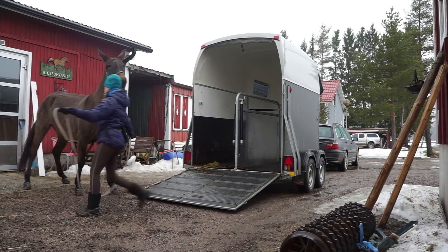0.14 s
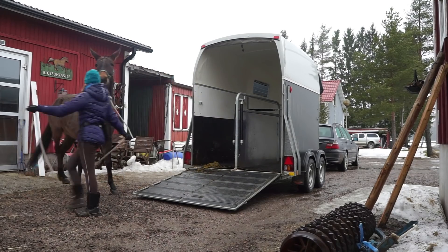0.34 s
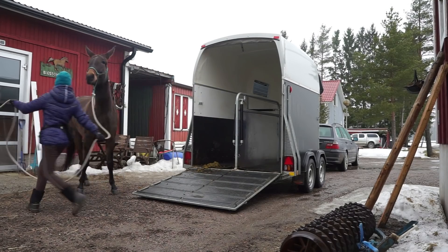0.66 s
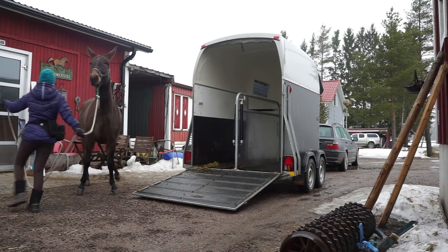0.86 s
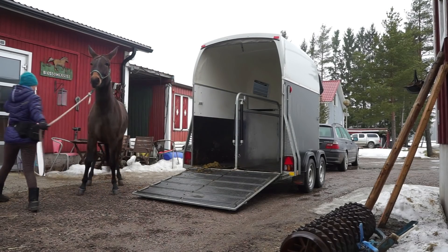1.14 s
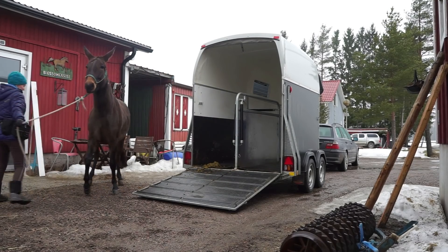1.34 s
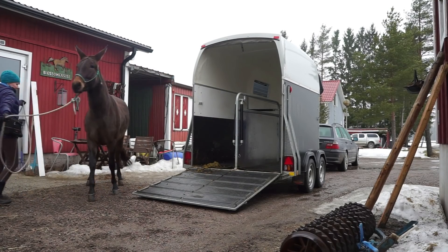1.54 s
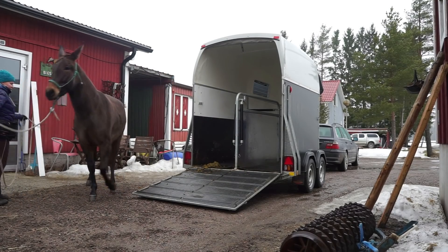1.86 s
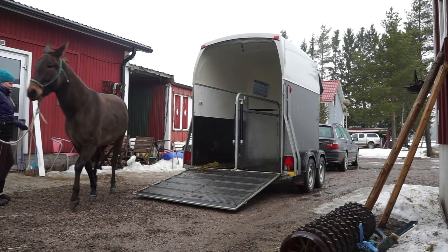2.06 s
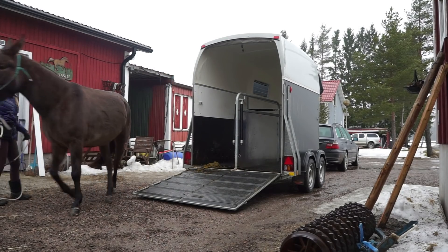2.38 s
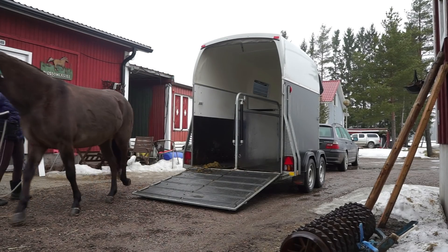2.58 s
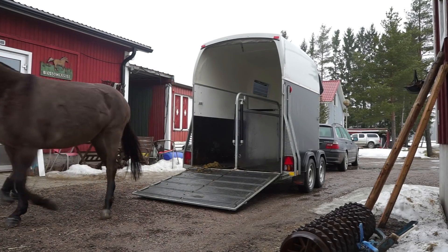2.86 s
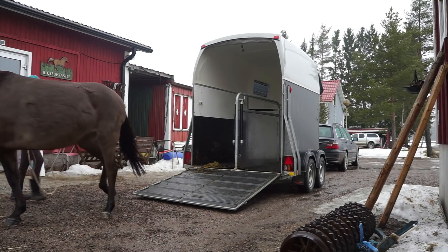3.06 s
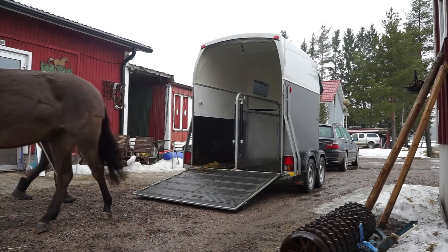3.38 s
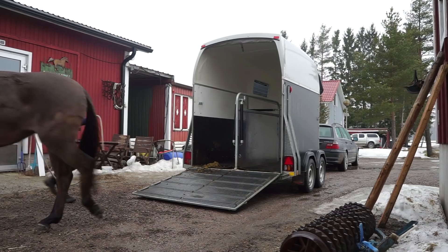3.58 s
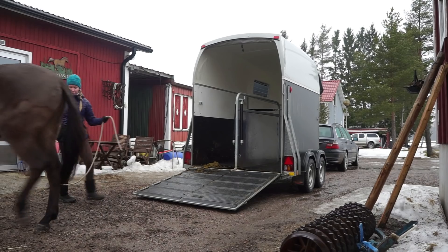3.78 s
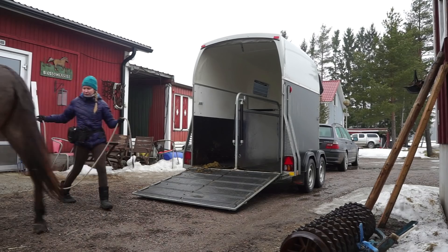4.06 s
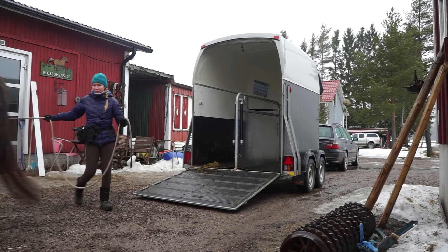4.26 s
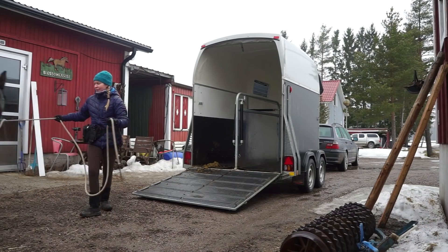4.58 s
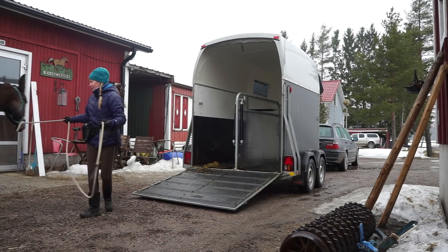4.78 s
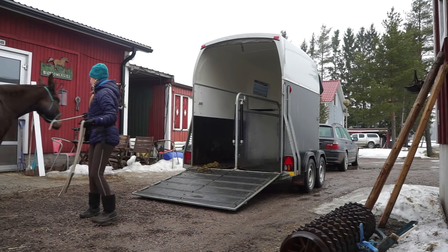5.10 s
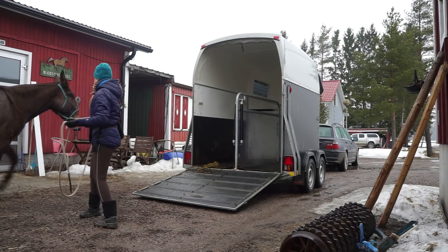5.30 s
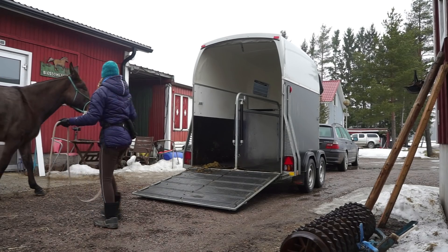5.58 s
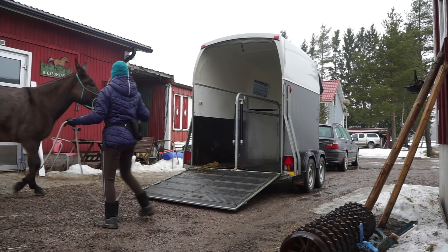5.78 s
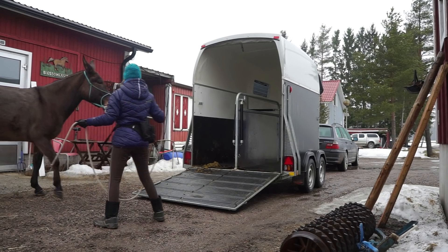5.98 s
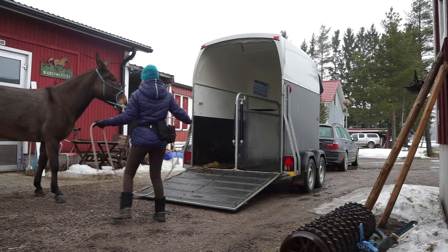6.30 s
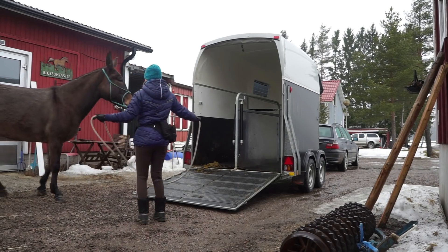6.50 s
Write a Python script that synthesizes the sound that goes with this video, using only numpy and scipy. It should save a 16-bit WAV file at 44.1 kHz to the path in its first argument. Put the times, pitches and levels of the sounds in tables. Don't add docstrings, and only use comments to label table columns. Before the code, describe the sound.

Close, irregular hoofsteps on muddy gravel in an open yard. Stones crunch, crack and snap brightly, hollow hooves knock, mud gives small dull squelches and the ground thuds low. The steps come thick and loud in the first three seconds, then thin out into lighter, separate crunches. Wind puffs lightly on the stereo microphone, over a faint distant hush, with a short reflection from a barn wall.

```python
import sys
import numpy as np
from scipy import signal
from scipy.fft import rfft, irfft, next_fast_len
from scipy.io import wavfile

SR = 44100
rng = np.random.default_rng(int(sys.argv[2]) if len(sys.argv) > 2 else 0)


def master(y):
    cut = np.clip(np.atleast_2d(y).T, -1, 1)
    pcm = np.round(cut * 32767)
    wavfile.write(sys.argv[1], SR, pcm.astype(np.int16))


def makeup_ratio(level_db):
    decades = np.asarray(level_db, float) / 20
    return 10 ** decades


N = 293265


def rms_one(x):
    return x / np.sqrt(np.mean(x ** 2) + 1e-20)


def band(x, low_hz, high_hz):
    return signal.sosfilt(signal.butter(2, [low_hz, high_hz], "band", fs=SR, output="sos"), x)


def drift(rate_hz):
    steps = rng.standard_normal(800)
    return np.interp(np.arange(N) / SR * rate_hz, np.arange(800), steps) * 1.184


def between(rows):
    return np.interp(np.arange(N) / SR, *np.transpose(rows))


def swell(s, rise_ms, fall_ms, level_db):
    coarse = np.arange(0, N, 32)
    ms = (coarse[None] / SR - np.array(s)[:, None]) * 1000
    rise = np.maximum(np.array(rise_ms)[:, None] - 3, 1.0)
    fall = np.maximum(np.minimum(fall_ms, 55)[:, None] - 3, 1.0)
    loss_db = 8 * np.where(ms < 0, (ms / rise) ** 2, np.abs(ms / fall) ** 1.4)
    power = makeup_ratio(2 * (np.array(level_db)[:, None] - np.minimum(loss_db, 150))).sum(axis=0)
    return np.interp(np.arange(N), coarse, np.sqrt(power))


def cracks(per_s, spread_db):
    sizes = makeup_ratio(spread_db * np.minimum(rng.exponential(1, N), 5)) * rng.choice([-1, 1], N)
    return rms_one(sizes * (rng.random(N) < per_s / SR))


def ring(clicks, hz, cycles):
    r = np.exp(-np.log(1000) * hz / cycles / SR)
    w = 2 * np.pi * hz / SR
    return signal.lfilter([2 * np.sin(w) * np.sqrt(1 - r)], [1, -2 * r * np.cos(w), r * r], clicks + 1e-18)


# time in seconds, lag of the left port in ms.
BEARING_LAG = [(0, 0.16), (0.68, 0.28), (1.45, 0.12), (2.45, 0.093), (3.3, 0.36), (6.65, 0.3)]


def arrival(scatter_ms):
    lag = (between(BEARING_LAG) + scatter_ms * rng.standard_normal(N)) * SR / 1000
    return np.clip(np.arange(N) + np.round(lag).astype(int), 0, N - 1)


def placed(clicks, at):
    return np.array([np.bincount(at, clicks, N), clicks])


# frequency in Hz, level in dB per Hz.
HUSH_COLOUR = [(30, -28.5), (87, -10.5), (240, -0.5), (750, -6), (1850, -17.5), (5300, -41), (7500, -24.5),
               (10400, -26.5), (16000, -38)]


def hush():
    hz = np.arange(N // 2 + 1) * SR / N + 1
    mid, side = rfft(rng.standard_normal((2, N)))
    alike = 1 / (1 + (hz / 600) ** 2)
    colour_hz, colour_db = np.transpose(HUSH_COLOUR)
    colour = makeup_ratio(np.interp(np.log(hz), np.log(colour_hz), colour_db))
    pair = np.sqrt(1 + alike) * mid + np.sqrt(1 - alike) * side * [[1], [-1]]
    return makeup_ratio(-54) * rms_one(irfft(colour * pair, N))


# time in seconds, level in dB.
GUSTS = [(0, -52), (0.401, -35), (1.169, -40.5), (1.45, -53.5), (2.471, -61), (2.699, -43), (3.45, -70),
         (4.5, -49.5), (4.74, -70), (5.2, -53), (6.65, -82)]


def wind():
    shared, *own = rng.standard_normal((3, N))
    lumps = [makeup_ratio(7.2 * drift(22)) * rms_one(band(v + 0.11 * shared, 54, 121)) for v in own]
    return makeup_ratio(between(GUSTS) - 6.0) * np.array(lumps)


# time in seconds, settling in ms, coarse stones in dB, fine stones in dB.
STAMPS = [(0.063, 7, -26, -23), (0.295, 4.2, -31, -53), (0.38, 3.3, -32, -41), (0.467, 45, -43, -27),
          (0.628, 10, -34, -33), (0.87, 6.7, -22, -27), (1.035, 19, -31, -21.5), (1.114, 72, -40.5, -36),
          (1.4, 9.8, -41, -51), (1.482, 59, -55, -32.5), (1.64, 33, -29.5, -33.5),
          (1.78, 14.4, -27.5, -21.5), (2.009, 28, -40, -52.5), (2.056, 46, -40.5, -31.5),
          (2.283, 25, -60, -14), (2.379, 9.8, -24, -15), (2.805, 45, -39, -29), (2.848, 32, -26, -33.5),
          (3.286, 27, -49.5, -35.5), (3.623, 70, -37, -31), (4.165, 5.8, -85, -42), (4.429, 40, -37, -29),
          (4.784, 15.5, -44, -28.5), (4.938, 32, -58, -42.5), (5.08, 31, -63, -30), (5.093, 60, -38, -42),
          (5.365, 21, -64, -41), (6.107, 34.5, -43.5, -33), (6.322, 23, -36.5, -54), (6.57, 9, -65, -32.5)]
# time in seconds, loading in ms, coarse stones in dB, fine stones in dB.
GRINDS = [(0.1, 61, -33.5, -34), (0.519, 15, -29, -23.5), (0.579, 22.6, -24, -21),
          (0.936, 47, -38.5, -29.5), (1.058, 6.4, -25.5, -9.5), (1.15, 13, -32.5, -31.5),
          (1.184, 28, -42.5, -37.5), (1.512, 32, -34.5, -29), (1.556, 17.4, -32.5, -20.5),
          (1.824, 14, -34.5, -29.5), (1.904, 36, -39.5, -33.5), (2.16, 32, -32, -37),
          (2.256, 7.8, -48.5, -33.5), (2.723, 12, -42, -29.5), (4.253, 16, -47.5, -28.5),
          (5.395, 26, -45.5, -26.5), (5.569, 19, -53, -40.5), (5.706, 23, -47, -37.5),
          (5.769, 20, -56, -51), (6.013, 20.6, -46.5, -28), (6.394, 23, -68, -31.5),
          (6.452, 31.5, -41, -31), (6.495, 27, -47.5, -47.5), (6.591, 12, -82, -32.5)]
# time in seconds, settling in ms, coarse stones in dB, fine stones in dB.
TWISTS = [(0.009, 36, -39, -28.5), (0.214, 29, -35, -37), (0.495, 40, -27.5, -34), (0.722, 26, -38, -58),
          (0.781, 49, -36.5, -28), (0.843, 18, -38, -31.5), (0.887, 20, -37, -24.5),
          (0.991, 39, -33.5, -34.5), (1.59, 54, -33.5, -34), (2.319, 65, -29, -29), (2.557, 33, -48, -29),
          (2.648, 30, -50, -23), (3.075, 25.5, -41.5, -40), (3.199, 29, -42.5, -64), (3.319, 25, -45, -56),
          (3.401, 42, -46, -60), (3.842, 7.8, -66, -39), (3.899, 48, -43, -34), (4.048, 290, -52.5, -49.5),
          (4.309, 36.5, -32.5, -34), (5.179, 30, -43.5, -41.5), (5.599, 12, -47.5, -48),
          (6.262, 31, -49, -45)]
# time in seconds, settling in ms, level in dB.
PEBBLE_STAMPS = [(0.495, 15, -33), (0.701, 58, -36.5), (1.06, 17, -19), (1.482, 46, -36),
                 (1.638, 3.2, -17.5), (3.311, 26, -33.5), (4.43, 49, -28), (4.783, 26, -37),
                 (4.937, 10, -39), (5.005, 15, -43)]


def footfalls():
    stamp_rise_ms, grind_fall_ms = 9.4, 14
    pressed = [(s, stamp_rise_ms, ms, *db) for s, ms, *db in STAMPS]
    pressed += [(s, ms, grind_fall_ms, *db) for s, ms, *db in GRINDS]
    pressed += [(s, 0.66 * ms, ms, *db) for s, ms, *db in TWISTS]
    rows = []
    for s, rise, fall, coarse, fine in pressed:
        medium = coarse + 0.51 * (fine - coarse) - 0.5
        rows.append((s, rise, fall, coarse, medium, fine))
    spill_db = -14
    rows += [(s, stamp_rise_ms, ms, db + spill_db, db, db + spill_db) for s, ms, db in PEBBLE_STAMPS]
    return np.transpose(rows)


# lowest pitch in Hz, highest pitch in Hz, cycles rung,
# cracks per second, size spread in dB.
STONES = [
    (2160, 3630, 6.9, 2000, 1.5),
    (3670, 6820, 9.1, 2200, -0.5),
    (6770, 9600, 15.3, 4500, 3),
]
# time in seconds, level in dB.
DRAG = [(0, -57), (0.401, -43), (1.169, -44), (1.21, -55.5), (1.45, -71.5), (1.5, -41), (1.92, -54.5),
        (1.97, -61), (2.471, -59), (2.77, -51), (2.972, -61), (3.38, -42.5), (3.47, -67), (3.9, -48),
        (4.2, -59.5), (4.5, -47), (4.72, -59), (5.5, -59), (5.9, -58), (6.65, -59.5)]


def gravel():
    s, rise, fall, *levels = footfalls()
    drag = makeup_ratio(between(DRAG) - 3.5 + 3.0 * drift(25))
    at = arrival(scatter_ms=0.052)
    out = 0
    for (low_hz, high_hz, cycles, per_s, spread_db), level_db in zip(STONES, levels):
        force = np.hypot(swell(s, rise, fall, level_db), drag) * makeup_ratio(2.0 * drift(70))
        clicks = force * cracks(per_s, spread_db)
        dealt = rng.integers(0, 8, N)
        stones = 0
        for k, hz in enumerate(np.geomspace(low_hz, high_hz, 8)):
            load = clicks * (dealt == k) * makeup_ratio(2.88 * drift(30))
            stones = stones + ring(placed(load, at), hz, cycles)
        stones = band(stones, 0.88 * low_hz, 2.28 * high_hz)
        out = out + band(stones, 0.49 * low_hz, 0.95 * high_hz)
    bare = np.hypot(swell(s, rise, fall, .5 * (levels[1] + levels[2])), drag) * cracks(3700, 2.6)
    return out + makeup_ratio(-19) * band(placed(bare * makeup_ratio(1.2 * drift(39)), at), 9500, 18000)


# time in seconds, level in dB, pitch in Hz.
CLIPS = [(0.379, -16, 1110), (0.869, -18.5, 1020), (0.988, -22, 900), (1.398, -28.5, 1060),
         (2.007, -24.5, 1020), (2.254, -19, 1210)]
# time in seconds, level in dB, pitch in Hz.
TAPS = [(0.182, -29, 985), (0.214, -19.5, 1010), (0.295, -15.5, 970), (0.578, -10.5, 920),
        (0.631, -21, 820), (1.564, -15.5, 920), (1.612, -23.5, 845), (1.64, -23, 920), (1.822, -26, 1160),
        (1.903, -29, 930), (2.853, -23.5, 826), (4.81, -29.5, 950)]
# time in seconds, level in dB, pitch in Hz.
LANDINGS = [(0.066, -24, 920), (0.49, -40, 866), (0.891, -32, 1070), (1.589, -33, 920), (1.78, -28.5, 1090),
            (2.06, -28, 950), (2.813, -29, 900), (3.08, -36.5, 960), (3.648, -30.5, 1020),
            (3.908, -32, 930), (4.247, -30, 1140), (4.3, -27.5, 1100), (4.353, -31, 1030),
            (4.426, -31, 1050), (4.955, -41.5, 925), (5.168, -33.5, 930), (5.386, -28, 1100),
            (5.701, -38.5, 1100), (5.77, -39, 970), (6.02, -35.5, 1016), (6.111, -36, 1260),
            (6.326, -30.5, 1150), (6.452, -35, 1240)]
# time in seconds, level in dB, pitch in Hz.
ROCKS = [(0.01, -30.5, 1020), (0.243, -32, 1010), (0.52, -23.5, 940), (0.743, -32.5, 923),
         (0.934, -27, 1220), (1.044, -29, 1060), (2.334, -27.5, 1080), (2.648, -36, 930), (3.33, -44, 880),
         (4.04, -40, 920), (5.113, -30.5, 1140), (5.6, -37, 870), (6.265, -38, 976)]


def hoof():
    out = np.zeros((2, N))
    knocks = placed(cracks(1500, 2.8), arrival(scatter_ms=0.15))
    kinds = [(CLIPS, 2, 8.6), (TAPS, 6.3, 8.7), (LANDINGS, 10.4, 29.3), (ROCKS, 37.5, 40)]
    for rows, rise, fall in kinds:
        for s, level_db, hz in rows:
            a, b = max(round((s - .06) * SR), 0), min(round((s + .2) * SR), N)
            ms = (np.arange(a, b) / SR - s) * 1000 + 3
            loss_db = 7.8 * np.where(ms < 0, (ms / rise) ** 2, ms / (fall - 3))
            force = makeup_ratio(level_db - loss_db) * knocks[:, a:b]
            out[:, a:b] += 0.5 * (1.01 * ring(force, hz * 0.91, 5.5) - 0.8 * ring(force, hz * 1.297, 5.2))
    out = makeup_ratio(0.5) * band(out, 603, 1720)
    rolling = makeup_ratio(between(DRAG) - 0.5 + 1.0 * drift(17))
    return out + rolling * rms_one(band(placed(cracks(900, 1.6), arrival(scatter_ms=0.21)), 683, 1390))


# time in seconds, peak in dB, pitch in Hz, dying
# time in ms.
GRATING_CHIPS = [(0.0593, -27, 7160, 6.0), (0.2009, -39, 7250, 5.5), (0.4783, -27, 7660, 6.0),
                 (0.5122, -20, 8100, 5.6), (0.5686, -25, 7350, 6.0), (0.6265, -34, 7610, 6.0),
                 (0.7502, -32.5, 7340, 6.0), (0.8657, -16, 8500, 5.8), (0.8839, -25, 7280, 6.0),
                 (0.9822, -32, 7450, 6.0), (1.0296, -5.5, 8550, 6.0), (1.05, 0.5, 8620, 7.3),
                 (1.1139, -15, 8080, 6.4), (1.1473, -30.5, 7800, 5.1), (1.3947, -44, 7400, 6.0),
                 (1.482, -29, 7790, 6.0), (1.488, -25, 7450, 5.5), (1.5489, -19, 7880, 6.0),
                 (1.6392, -16.5, 7900, 5.6), (1.7818, -24, 7300, 7.4), (1.8188, -28.5, 7530, 6.0),
                 (2.0547, -23, 7600, 6.0), (2.058, -19.5, 7240, 6.0), (2.147, -23, 7260, 15),
                 (2.2488, -29, 7900, 5.3), (2.2824, -14, 7700, 6.0), (2.38, -9, 7600, 5),
                 (2.5551, -31, 7480, 5.1), (2.6354, -23, 7560, 5.1), (2.805, -23, 7610, 5.6),
                 (3.6207, -30, 7360, 5.4), (3.626, -25, 7400, 5.6), (4.1609, -47, 7730, 6.5),
                 (4.2477, -26.5, 7500, 5.7), (4.4293, -31, 7300, 6.0), (4.778, -31.5, 7430, 6.0),
                 (5.0739, -34, 7500, 5.6), (5.3662, -37, 7770, 6.0), (5.389, -31, 7930, 6.5),
                 (5.9963, -32, 7410, 6.0), (6.0097, -32, 7800, 6.0), (6.109, -34, 7770, 6.0),
                 (6.3683, -27, 7720, 6.0), (6.4283, -25, 7600, 6.0), (6.5675, -36, 7100, 5.5),
                 (1.058, -12, 8500, 7.0), (2.6456, -15, 7200, 7.8), (2.651, -16, 6560, 3.6),
          (2.657, -15, 6800, 4.9), (2.669, -20.5, 6900, 11), (2.7202, -33.5, 7500, 6.5),
          (6.589, -28, 6800, 10), (5.09, -32, 1700, 14.0)]
# time in seconds, peak in dB, pitch in Hz.
LARGE_CHIPS = [(0.063, -21, 2100), (0.2009, -35, 2770), (0.2897, -27, 4520), (0.376, -23, 1860),
               (0.4524, -29, 5340), (0.471, -17.5, 2500), (0.492, -13.5, 4360), (0.5586, -24, 3380),
               (0.5807, -13, 2450), (0.8664, -24, 5060), (1.0321, -22, 4300), (1.05, -8.5, 5070),
               (1.474, -27.5, 5200), (1.5509, -21, 4000), (1.639, -6.5, 3500), (1.903, -21.5, 3370),
               (2.0567, -39, 4670), (2.1485, -25, 3130), (2.2854, -16, 5820), (2.3695, -11.5, 3020),
               (2.644, -44, 5030), (2.7202, -48, 4330), (2.8055, -34, 5950), (2.8447, -11.5, 2560),
               (2.8455, -24, 4330), (3.6212, -28, 6030), (4.2956, -29, 4900), (4.4302, -18.5, 5100),
               (4.779, -24, 5520), (5.0883, -30, 2340), (5.39, -27, 3670), (6.321, -35, 3260),
               (6.5904, -38, 6000)]
# time in seconds, peak in dB, dying time in ms.
SPRAYS = [(0.5133, -24, 13), (1.0301, -36.5, 8.7), (1.4735, -51, 12.0), (1.7729, -41, 12.0),
          (2.0502, -37, 11), (2.2847, -39, 12.0), (2.3795, -27.5, 8.9), (2.6294, -40.5, 7.2),
          (3.6142, -33, 11), (4.2453, -58, 12.0), (4.425, -39, 12.0), (4.777, -58, 12.0),
          (5.0833, -38, 12.0), (5.3666, -45, 11), (6.11, -35, 14), (6.4455, -42, 11)]


def chips():
    out = np.zeros((2, N))
    grit = placed(cracks(6000, 1.8), arrival(scatter_ms=0.02))
    ms = np.arange(round(.08 * SR)) / SR * 1000
    lag = between(BEARING_LAG) * SR / 1000
    # dying time in ms, cycles rung
    rows = [(*row, 120) for row in GRATING_CHIPS]
    rows += [(*row, 6.7, 29) for row in LARGE_CHIPS]
    rows += [(s, db + 3, 13200, fall, 4.0) for s, db, fall in SPRAYS]
    for s, level_db, hz, fall, cycles in rows:
        a = round((s - .001) * SR)
        press = (1 - np.exp(-ms / 0.9)) * np.exp(-ms / fall)
        force = press[:N - a] * grit[:, a:a + len(ms)]
        force[[0, 1], [44 + round(lag[a]), 44]] += makeup_ratio(-5)
        force = makeup_ratio(level_db - 4) * force
        out[:, a:a + len(ms)] += ring(force, hz, cycles) + makeup_ratio(-36.5) * force
    return band(out, 400, 14500)


# time in seconds, length in ms, level in dB.
MUD = [(0.068, 17, -40.5), (0.103, 3.5, -33.5), (0.287, 20, -36.5), (0.378, 5.8, -33), (0.472, 22, -35),
       (0.516, 22, -37), (0.629, 6.5, -35.5), (0.871, 16, -37), (1.041, 36, -42.5), (1.83, 120, -48),
       (1.157, 22, -39), (1.572, 5.4, -33.5), (1.638, 18.6, -33.5), (2.06, 18, -37), (2.149, 7.8, -37),
       (2.31, 18, -39), (2.378, 9, -45.5), (3.08, 15, -39.5), (3.909, 29, -43.5), (4.253, 9.2, -41.5),
       (4.366, 8, -39), (4.434, 18, -39.5), (4.782, 10.6, -40), (4.958, 5, -40.5), (5.392, 17, -40),
       (5.19, 77, -44.5), (3.33, 34, -50), (5.62, 74, -48.5), (6.013, 13, -41.5), (2.85, 25, -43.5),
       (6.375, 21, -42.5), (6.448, 10.6, -42)]


def mud():
    s, length_ms, level_db = np.transpose(MUD)
    sliding = makeup_ratio(between(DRAG) - 7.5)
    squeeze = np.hypot(swell(s, length_ms, 1.9 * length_ms, level_db), sliding)
    return squeeze * rms_one(band(cracks(3000, 3.8), 238, 489))


def low_pushes(rows, pan_db):
    out = np.zeros((2, N))
    t = np.arange(round(.15 * SR)) / SR
    side_db = np.array([[.5], [-.5]]) * pan_db - abs(pan_db) / 4
    for s, level_db, hz in rows:
        at = round(s * SR)
        push = rms_one(t * hz * np.exp(-t * hz * 1.36)) * 0.25 * np.sin(2 * np.pi * hz * t)
        out[:, at:at + len(t)] += makeup_ratio(level_db + 5.0 + side_db) * push[:N - at]
    return out


# time in seconds, peak in dB, pitch in Hz.
THUDS = [(0.08, -31, 81), (0.283, -31, 138), (0.476, -33, 89.5), (0.516, -31, 94), (0.579, -43, 56.5),
         (0.869, -29.5, 108), (1.039, -42, 56), (1.556, -38, 79.5), (1.635, -33, 115), (1.768, -44, 93),
         (2.055, -31.5, 102), (2.151, -46, 91.5), (2.808, -29, 109), (3.292, -42.5, 139), (3.89, -37, 130),
         (4.215, -42, 82), (4.945, -44, 87), (5.082, -39, 104), (6.004, -47, 93), (6.441, -44.5, 150)]


def thuds():
    return low_pushes(THUDS, pan_db=4.5)


# time in seconds, peak in dB, pitch in Hz.
CLODS = [(0.094, -26, 513), (0.287, -23, 313), (0.374, -32, 281), (0.465, -27.5, 463), (0.51, -25.5, 457),
         (1.553, -30, 456), (2.001, -34, 726), (2.054, -24.5, 326), (2.08, -38, 376), (2.145, -40, 420),
         (2.369, -33, 340), (5.378, -38, 500)]


def clean_tones(rows, gain_db, rise_ms, lead_ms):
    out = np.zeros((2, N))
    lag_ms = between(BEARING_LAG)
    for s, level_db, hz in rows:
        a = round((s - lead_ms / 1000) * SR)
        ms = np.maximum(np.arange(round(.06 * SR)) / SR * 1000 - [[lag_ms[a]], [0]], 0)
        shape = (ms / rise_ms * np.exp(1 - ms / rise_ms)) ** 2
        out[:, a:a + ms.shape[1]] += makeup_ratio(level_db + gain_db) * shape * np.sin(2 * np.pi * hz * ms / 1000)
    return out


def clods():
    return clean_tones(CLODS, gain_db=-4, rise_ms=5.5, lead_ms=1.95)


# time in seconds, peak in dB, pitch in Hz.
PUFFS = [(0.203, -46, 79), (0.36, -28, 89), (0.659, -41, 59.2), (0.74, -31.5, 102), (0.787, -36, 106),
         (0.948, -36, 74), (1.192, -35, 73), (1.216, -34.5, 77.5), (1.281, -31.5, 80.4), (2.739, -40, 88)]


def puffs():
    return low_pushes(PUFFS, pan_db=-16.5)


# time in seconds, peak in dB, pitch in Hz.
HOOF_RINGS = [(0.463, -14, 854), (0.472, -19, 848), (0.487, -14.5, 840), (0.289, -24, 908),
              (0.57, -14, 988), (0.572, -21, 754), (0.624, -24.5, 760), (1.558, -16, 779),
              (1.558, -16, 1152), (1.585, -22, 1106), (1.606, -21.5, 782), (1.637, -22.5, 870),
              (1.818, -22, 1173), (2.0, -28, 1142), (2.251, -24.5, 1110), (2.33, -22, 1066),
              (2.843, -27, 730), (4.245, -29, 425), (4.295, -25, 950), (4.349, -32, 947),
              (5.381, -32.5, 944), (5.769, -37.5, 995), (6.316, -27, 1214)]


def hoof_rings():
    return clean_tones(HOOF_RINGS, gain_db=-7, rise_ms=5.8, lead_ms=3.0)


# time in seconds, level in dB.
SNAPS = [(0.2897, -28), (0.375, -35), (0.4928, -8), (0.5164, -12), (0.8653, -20.5), (1.0317, 4),
         (1.6387, -17), (2.0018, -27), (2.2822, -22.5), (2.6325, -26), (2.7202, -21), (2.844, -10),
         (4.2488, -14.5), (5.3818, -12), (6.316, -30), (6.3225, -19), (6.376, -22), (6.392, -21),
         (6.4035, -22), (6.591, -23)]


def snaps():
    s, level_db = np.transpose(SNAPS)
    clicks = np.zeros(N)
    clicks[(s * SR).astype(int)] = makeup_ratio(level_db - 15.0)
    clicks = placed(clicks, arrival(scatter_ms=0.042))
    return band(clicks, 900, 7000) + 0.33 * ring(clicks, 2600, 5.0)


def yard(x):
    t = np.arange(round(.3 * SR)) / SR
    t60_s = .11
    tail = band(rng.standard_normal((2, len(t))), 510, 18700) * makeup_ratio(-60 * t / t60_s) * (t > .002)
    tail = makeup_ratio(-4) * tail / np.sqrt(np.sum(tail ** 2, axis=1, keepdims=True))
    return x + signal.fftconvolve(x, tail, axes=1)[:, :N]


# frequency in Hz, left in dB, right in dB.
PORT_COLOUR = [(61.3, 24, 21.5), (240, 1.5, -4), (734, 5, -1), (2340, -1, -5.5), (5130, -0.5, -3),
               (5140, -2, 1.5), (6970, -3.5, -17.5), (7530, 2.5, -5), (8320, -5, -7), (9560, -13.5, -14.5),
               (10120, -12, -29.5), (12650, -3, 0.5), (16800, 13.5, 3.5)]


def ports(x):
    size = next_fast_len(N)
    hz, *colours = np.transpose(PORT_COLOUR)
    at = np.log(np.arange(size // 2 + 1) * SR / size + 1)
    gain_db = np.array([np.interp(at, np.log(hz), c) for c in colours])
    return irfft(rfft(x, size) * makeup_ratio(gain_db), size)[:, :N]


def scene():
    air = hush() + makeup_ratio(-2.0) * yard(gravel() + hoof() + mud() + snaps())
    close = chips() + clods() + hoof_rings()
    low = wind() + thuds() + puffs()
    return ports(air + close) + low


def low_pass(x):
    return signal.sosfilt(signal.butter(12, 16250, fs=SR, output="sos"), x)


def record(dry):
    x = signal.sosfilt(signal.butter(4, 47, "high", fs=SR, output="sos"), dry)
    x = .8 * np.tanh(x / .8)
    x = signal.sosfilt(signal.cheby2(12, 60, 16400, fs=SR, output="sos"), x)
    return low_pass(x)


dry = scene()
out = record(dry)
master(out)
```